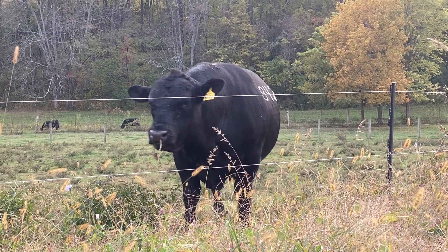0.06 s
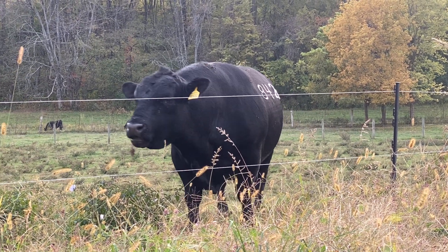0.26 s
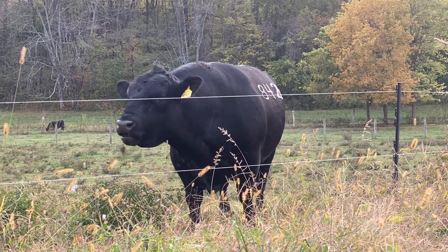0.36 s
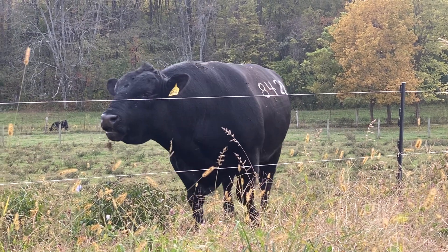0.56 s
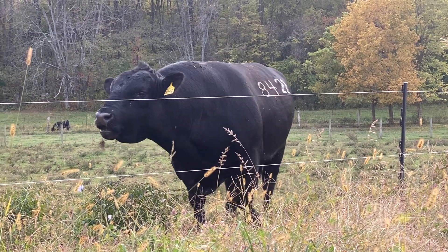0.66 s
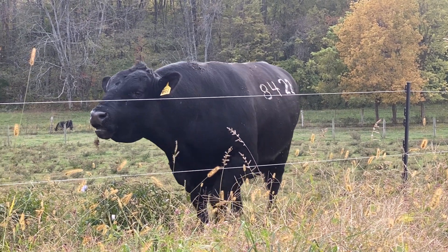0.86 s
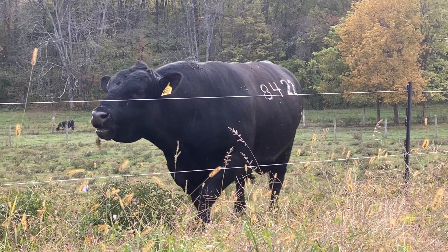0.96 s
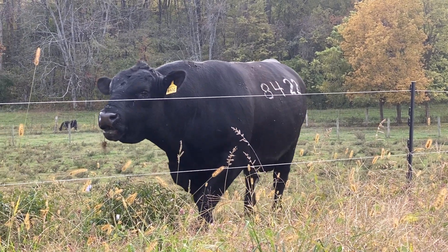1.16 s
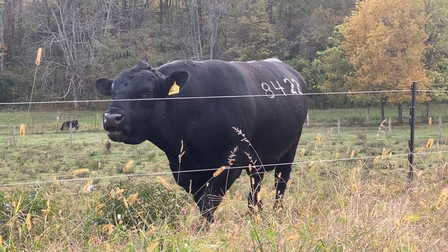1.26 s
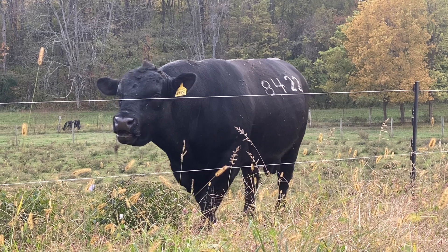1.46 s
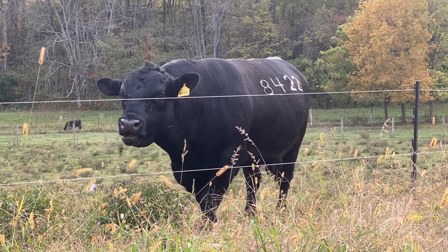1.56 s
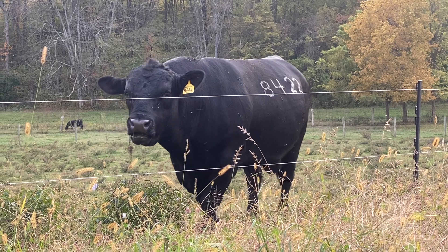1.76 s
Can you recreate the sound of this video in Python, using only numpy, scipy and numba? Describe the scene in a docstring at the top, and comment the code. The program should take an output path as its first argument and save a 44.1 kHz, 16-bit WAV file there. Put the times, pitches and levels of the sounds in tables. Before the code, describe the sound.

One long, low bellow from a bull grows out of a quiet hum and finishes with a snort and a soft smack. Katydids and crickets sing across the pasture over faint distant rumble, the bull a little left of the microphone.

```python
"""A bull in a pasture starts with a low hum, and his lips smack as they part.
The hum swells into one long bellow through barely open lips: slow pulses from his vocal folds
make his throat and muzzle ring. Then the voice drops, turns rough and ends in a breathy snort
and one last soft smack. All along, katydids and crickets sing over a faint distant rumble."""
import sys
import numpy as np
from scipy import signal
from scipy.fft import rfft, irfft
from scipy.io import wavfile
from scipy.ndimage import uniform_filter1d
from numba import njit

SR = 44100
rng = np.random.default_rng(int(sys.argv[2]) if len(sys.argv) > 2 else 0)


def wav_out(sig):
    """Save sig, one row per channel (or a flat mono array), as 16-bit PCM at SR to the path in sys.argv[1]."""
    wavfile.write(sys.argv[1], SR, np.round(np.clip(np.atleast_2d(sig).T, -1, 1) * 32767).astype(np.int16))


N = 79380

# How fast the vocal folds beat. Each row: time in seconds, pitch in Hz.
FOLD_PITCH = [(0, 78.4), (.05, 77.6), (.1, 87), (.16, 82), (.2, 86), (.245, 91), (.32, 94.5), (.37, 92.1),
              (.5, 91.9), (.63, 93.2), (.8, 92.6), (.98, 93.9), (1.12, 92.4), (1.24, 90.7), (1.29, 86),
              (1.34, 79), (1.4, 68.6)]
# How unevenly they beat. Each row: time in seconds, roughness from 0 to 1.
FOLD_ROUGHNESS = [(0, 0.03), (.13, 0), (.18, 0.3), (.27, 0.14), (.35, 0.05), (1.23, 0.06), (1.27, 0.35),
                  (1.33, 0.75)]


def bellow(jitter=0.061):
    """The vocal folds drive the whole voice, beating unevenly as they start and as they give out."""
    rough, = curve(FOLD_ROUGHNESS)
    pitch = curve(FOLD_PITCH)[0] * (1 + jitter * rough * walk(110))
    cycles = np.cumsum(pitch) / SR  # beats of the folds so far
    return chest_and_throat(cycles, pitch, rough) + muzzle_buzz(cycles, pitch)


# The low part of the voice. Each row: time in seconds, chest level in dB, throat level in dB,
# the frequency the throat rings at in Hz.
LOW_VOICE = [(0, -40, -39, 183.3), (.05, -41, -49, 213), (.085, -39.5, -55, 167), (.155, -40, -57.5, 171),
             (.182, -47.5, -34.5, 168), (.25, -47, -32.5, 186), (.33, -45, -22, 189.3),
             (.52, -44, -22.5, 190), (.69, -43, -20.5, 190), (.95, -40, -23, 206), (1.15, -40, -25, 208),
             (1.24, -40, -26, 204), (1.285, -46, -31, 219), (1.33, -43.5, -43.5, 271),
             (1.375, -45, -45, 245.5), (1.41, -81, -87, 272)]


def chest_and_throat(cycles, pitch, rough, width_hz=24.9, top_hz=340, shimmer_db=4):
    """The chest gives off the lowest tone, and the ringing throat lifts the next five overtones."""
    chest_db, throat_db, throat_hz = curve(LOW_VOICE)
    harmonic = np.arange(2, 7)[:, None]
    hz = harmonic * pitch
    gain = 1 / (throat_hz ** 2 - hz ** 2 + 1j * hz * width_hz)
    gain /= np.sqrt(1 + (hz / top_hz) ** 4)
    throat = (gain * np.exp(2j * np.pi * harmonic * cycles)).real.sum(0)
    throat /= np.sqrt((abs(gain) ** 2).sum(0))  # keep the level steady as the tone changes
    throat *= undb(throat_db + shimmer_db * rough * walk(120))
    chest = -undb(chest_db) * np.cos(2 * np.pi * cycles)
    return np.sqrt(2) * (chest + throat)


# How loud the buzz is. Each row: time in seconds, buzz level in dB, level of the nose's ring in dB.
BUZZ_LEVELS = [(0, -69, -53), (.08, -64, -86), (.15, -63, -55), (.19, -60.5, -45.5), (.29, -53, -51.5),
               (.38, -49.5, -47.5), (.56, -47.5, -49), (.7, -47, -46), (.93, -46.5, -40), (1.1, -45.5, -43),
               (1.24, -44.5, -43.5), (1.275, -51.5, -54), (1.335, -50.5, -65), (1.4, -80, -101)]
# The next four tables list resonances, the frequencies at which a hollow space rings.
# Each row: frequency in Hz once the jaw is open, width in Hz, relative level in dB.
# The mouth's are broad and die away within each pulse.
MOUTH_RINGS = [(900, 540, 0), (1400, 240, -3)]
# The muzzle's are narrow and ring on between pulses.
MUZZLE_RINGS = [(559.3, 9.3, -5.5), (648, 61, -3.5), (836.2, 36, 2), (1372, 29, -11.5), (1480, 36, -1.5)]
# High ones in the nose wheeze with each puff of air.
WHEEZE_RINGS = [(1990, 110, -1.5), (2603, 140, -3.5), (3070, 88, -3)]
# Those of the nostrils colour both the breath here and the snort later.
NOSTRIL_RINGS = [(475, 210, -9.5), (825, 158, 1), (1070, 74, 8), (1390, 165, 0.5), (1730, 130, -5),
                 (2680, 640, -20), (4230, 1100, -27.5)]
JAW_START_S, JAW_OPEN_S = 0.21, 0.311


def muzzle_buzz(cycles, pitch, click_top_hz=1650, rasp_db=2.4, puff_cycles=.14, nose_hz=461.2):
    """Each closing of the folds sends a rounded click into muzzle and nose, and a puff of air with it."""
    buzz_db, nose_db = curve(BUZZ_LEVELS)
    clicks = sum(np.cos(2 * np.pi * k * cycles) / np.sqrt(1 + (k * pitch / click_top_hz) ** 16)
                 for k in range(3, 26))
    strength = undb(rasp_db * rng.standard_normal(400))[np.round(cycles).astype(int)]  # one per click
    puffs = rng.standard_normal(N) * np.exp(-(cycles % 1) / puff_cycles)
    jaw, = curve([(JAW_START_S, 0.8), (JAW_OPEN_S, 1)])  # the resonances rise as the jaw drops
    voiced = unit(cavity(clicks * strength, MOUTH_RINGS + MUZZLE_RINGS, np.sqrt(jaw)))
    breath = .45 * unit(cavity(puffs, NOSTRIL_RINGS, jaw))
    wheeze = undb(-17) * unit(cavity(puffs, WHEEZE_RINGS))
    nose = undb(nose_db) * unit(cavity(clicks, [(nose_hz, 36, 0)], jaw))
    return undb(buzz_db) * (voiced + breath + wheeze) + nose + lip_ring(clicks)


# How loud the ring at the lips is. Each row: time in seconds, level in dB.
LIP_LEVEL = [(.15, -91), (.185, -60.5), (.3, -62.5), (.35, -57), (.45, -49.5), (.52, -52), (.58, -51),
             (.66, -81.5)]


def lip_ring(clicks, shut_hz=870, open_hz=1076, width_hz=75):
    """A narrow resonance rises and sings out as the lips part."""
    db, = curve(LIP_LEVEL)
    hz, = curve([(JAW_START_S, shut_hz), (0.32, open_hz)])
    return undb(db) * unit(cavity(clicks, [(hz, width_hz, 0)]))


# The rush of air through the nostrils. Each row: time in seconds, level in dB.
SNORT_LEVEL = [(1.17, -100), (1.25, -53), (1.275, -47), (1.315, -46), (1.33, -40.5), (1.35, -34.8),
               (1.368, -38.5), (1.376, -44), (1.393, -47.5), (1.405, -59), (1.47, -76)]


def snort(flap_hz=140, flap_depth=.6, flutter_db=0.5):
    """The last air bursts through the nostrils, chopped unevenly by their flapping rims."""
    db, = curve(SNORT_LEVEL)
    flaps = np.cumsum(flap_hz * undb(2 * walk(200))) / SR
    air = rng.standard_normal(N) * (1 + flap_depth * np.cos(2 * np.pi * flaps)) ** 2
    return undb(db + flutter_db * walk(150)) * unit(cavity(air, NOSTRIL_RINGS))


# Lip and tongue smacks. Each row: start in seconds, peak level in dB, frequency in Hz, width in Hz.
MOUTH_SMACKS = [(0.0892, -44, 2000, 1100), (0.0945, -46.5, 2400, 1300), (0.11, -33.5, 1110, 900),
                (1.272, -37.5, 1250, 1550), (1.511, -47.5, 606, 434)]


def smacks(tail_gain=0.086, decay_s=0.01):
    """Lips and tongue make wet clicks in the mouth, each with a short crackling tail."""
    out = np.zeros(N)
    for start, db, hz, width in MOUTH_SMACKS:
        age = np.arange(N) - int(start * SR)
        tail = (age > 0) * np.exp(-abs(age) / SR / decay_s) * rng.standard_normal(N)
        push = (age == 0) + tail_gain * tail
        click = cavity(ring(push, hz, 2 * width), [(hz, width, 0)])
        out += undb(db) * click / abs(click).max()
    return out


# Songs in the grass. Each row: frequency in Hz, width in Hz, level in dB,
# peak of the first wing stroke in seconds, depth of the pulsing from 0 to 1.
INSECT_SONGS = [(14200, 2950, -47.2, .016, 0.79), (14400, 2600, -54.5, 0.023, 0.85),
                (10100, 2300, -56.7, 0.0024, 0.55), (6320, 190, -67, 0.066, 0.41)]
STROKES_PER_SECOND = (30.9, 19.6, 61.9, 9.9)  # one for each song


def insects(rise=.58, fall=.16, drift=.03, scatter_db=2.0, right_lag_ms=.287):
    """Katydids and crickets scrape their wings: each stroke is a hiss that swells and stops short."""
    freqs, t = np.fft.rfftfreq(N, 1 / SR), np.arange(N) / SR
    song = np.zeros(N)
    for (hz, width, db, first, depth), rate in zip(INSECT_SONGS, STROKES_PER_SECOND):
        strokes = rate * (t - first + drift * np.cumsum(walk(24)) / SR) + rise
        force = undb(scatter_db * rng.standard_normal(200))[np.floor(strokes).astype(int)]
        swell = force * np.interp(strokes % 1, [0, rise, rise + fall], [0, 1, 0])
        scrape = noise(1 / np.sqrt(1 + (2 * (freqs - hz) / width) ** 8))
        song += undb(db) * unit(scrape * (1 - depth + depth * swell))
    right = irfft(rfft(song) * np.exp(-2j * np.pi * freqs * right_lag_ms / 1000), N)
    return np.array([song, right])


# The tone of the rumble and air. Each row: frequency in Hz, relative level in dB.
FIELD_TONE = [(25, -26), (48, -12.5), (70, 1.5), (92, -0.5), (120, -8), (170, -10), (260, -11.5),
              (340, -24), (600, -21.5), (1000, -26), (1400, -25), (1900, -30.5), (3600, -40), (5000, -30),
              (8000, -31.5), (12000, -42.5)]
# How much the two ears differ. Each row: frequency in Hz, level in dB against the sound they share.
FIELD_SPREAD = [(60, -17), (250, -11.5), (600, -1), (1400, 2.5), (2500, -22), (7000, -95.5)]


def field(level_db=-50.5):
    """Distant rumble and soft air over the pasture, spread widest in the middle frequencies."""
    tone = undb(spectrum(FIELD_TONE)[0])
    spread = undb(spectrum(FIELD_SPREAD)[0])
    side = irfft(rfft(noise(tone)) * spread, N)
    return undb(level_db) * (noise(tone) + np.array([side, -side]))


def undb(db):
    """Turn decibels into a number to multiply by."""
    return 10 ** (np.asarray(db) / 20)


def unit(x):
    """Scale a sound to an average (rms) level of 1."""
    return x / np.sqrt(np.mean(x ** 2) + 1e-18)


def curve(table):
    """Join a table's points in time with straight lines, one curve for each value column."""
    times, *columns = np.array(table, float).T
    return [np.interp(np.arange(N) / SR, times, col) for col in columns]


def spectrum(table):
    """Join a table's points across frequency, one curve for each value column."""
    hz, *columns = np.array(table, float).T
    log_freqs = np.log(np.fft.rfftfreq(N, 1 / SR) + 1)
    return [np.interp(log_freqs, np.log(hz), col) for col in columns]


def noise(gain):
    """Noise shaped by a gain for each frequency, then scaled to level 1."""
    return unit(irfft(rfft(rng.standard_normal(N)) * gain, N))


def walk(rate):
    """A smooth random wobble of size about 1, with `rate` new values a second."""
    hold = max(int(SR / rate), 1)
    steps = np.repeat(rng.standard_normal(N)[:N // hold + 1], hold)[:N]
    return unit(uniform_filter1d(uniform_filter1d(steps, hold), hold))


@njit
def band_pass(x, hz, width):
    """A filter that lets through only a band around a moving frequency."""
    out, band_state, low_state = np.empty(len(x)), 0., 0.
    for i in range(len(x)):
        tuning, damping = np.tan(np.pi * hz[i] / SR), width / hz[i]
        band = (band_state + tuning * (x[i] - low_state)) / (1 + tuning * (tuning + damping))
        band_state = 2 * band - band_state
        low_state += 2 * tuning * band
        out[i] = damping * band
    return out


def ring(x, hz, width):
    """One resonance: its own frequency passes at full strength, others are weakened."""
    return band_pass(x + 1e-18, hz * np.ones(N), float(width))


def cavity(x, rings, scale=1):
    """A hollow space with steep resonances side by side; `scale` moves them all up or down."""
    return sum(undb(db) * ring(ring(x, hz * scale, width), hz * scale, width) for hz, width, db in rings)


# Where the bull is heard. Each row: frequency in Hz, left level minus right level in dB,
# how far the left ear's wave is ahead in radians.
BULL_DIRECTION = [(190, -1, -0.16), (266, 1.5, -0.3), (456, -1, -0.19), (770, 4, -0.14), (1100, 4.5, -0.77),
                  (1430, 3, -1.3), (2000, 0.5, 0)]


def scene():
    """The bull a little to the left, the pasture all around."""
    bull = rfft(bellow() + snort() + smacks())
    pan_db, lead = spectrum(BULL_DIRECTION)
    to_left = undb(pan_db / 2) * np.exp(.5j * lead)
    return irfft(np.array([bull * to_left, bull / to_left]), N) + insects() + field()


def record(dry, top_hz=16000):
    """Cut away the very highest treble."""
    return signal.sosfilt(signal.ellip(10, .2, 80, top_hz, fs=SR, output="sos"), dry)


dry = scene()
out = record(dry)
wav_out(out)
```